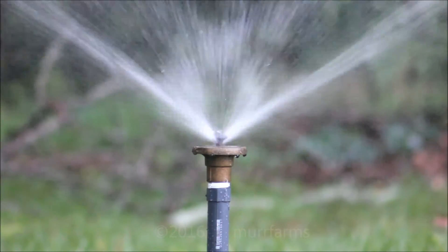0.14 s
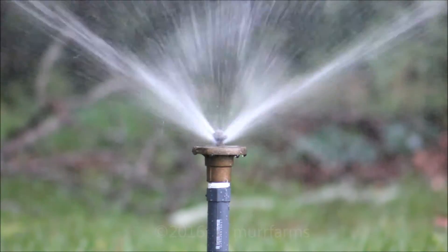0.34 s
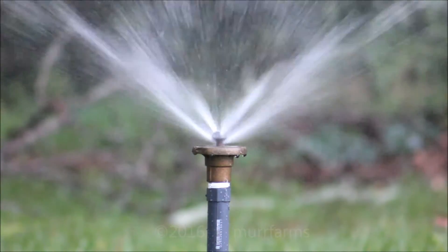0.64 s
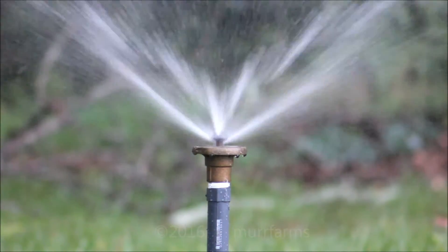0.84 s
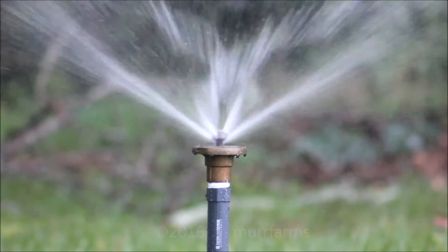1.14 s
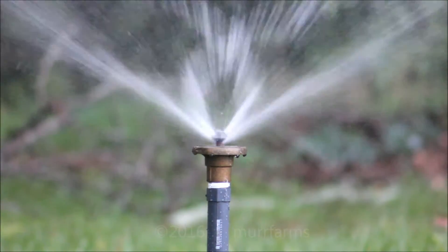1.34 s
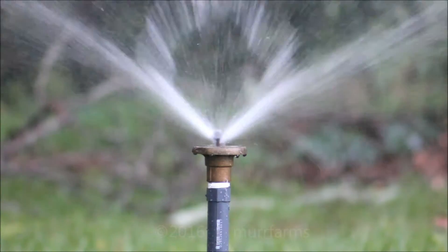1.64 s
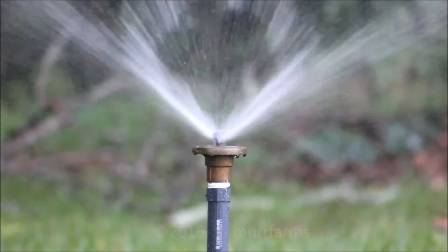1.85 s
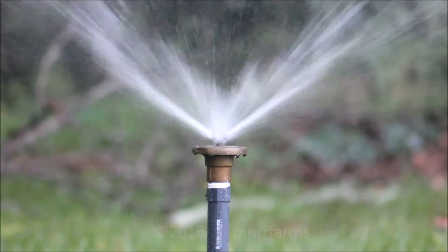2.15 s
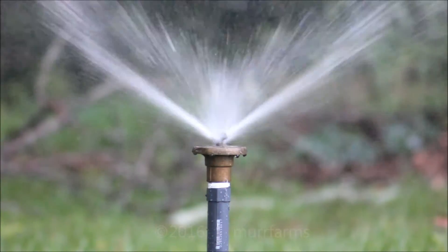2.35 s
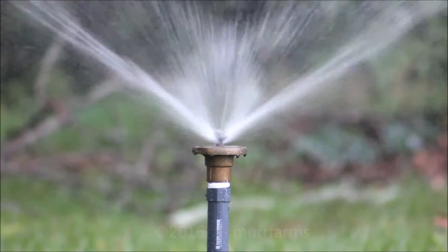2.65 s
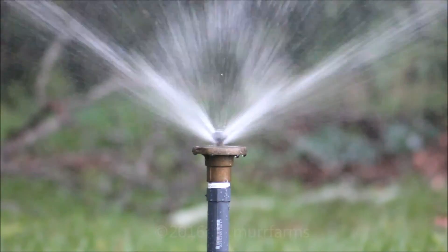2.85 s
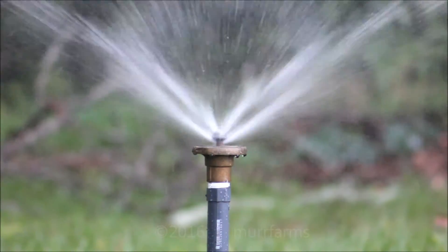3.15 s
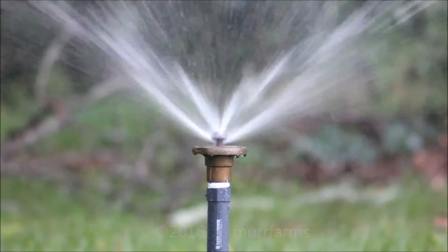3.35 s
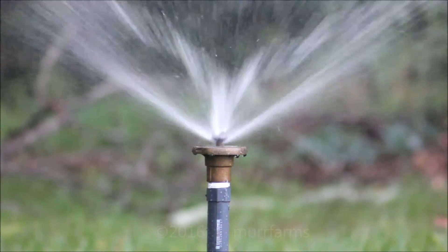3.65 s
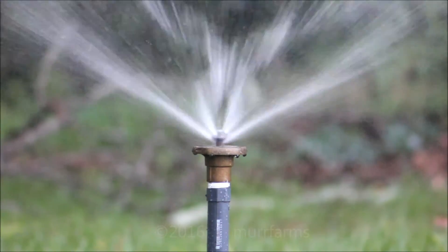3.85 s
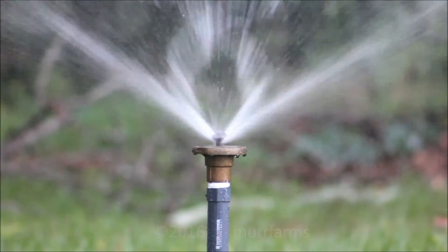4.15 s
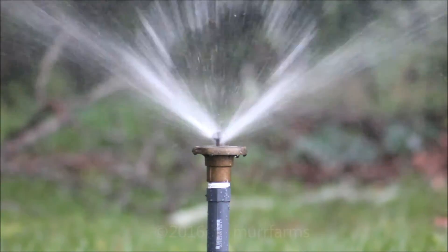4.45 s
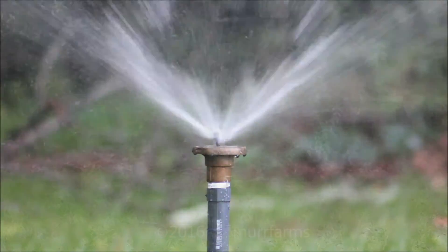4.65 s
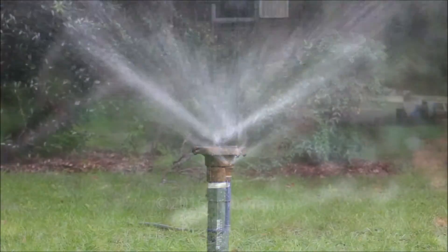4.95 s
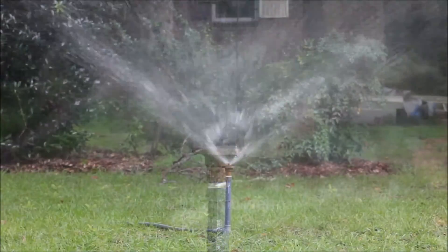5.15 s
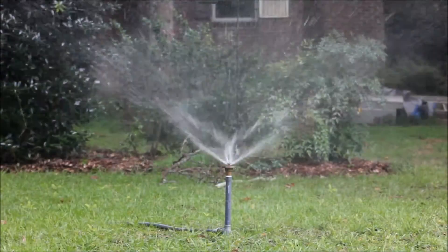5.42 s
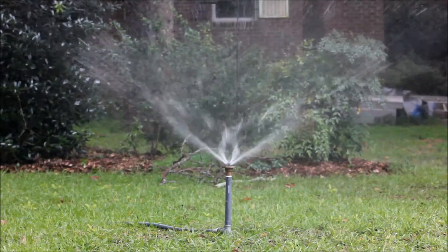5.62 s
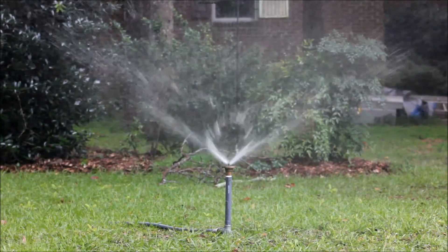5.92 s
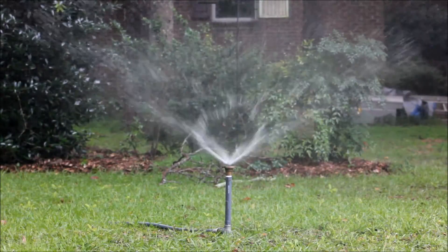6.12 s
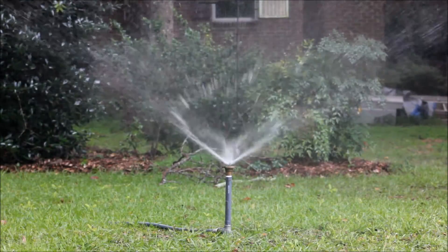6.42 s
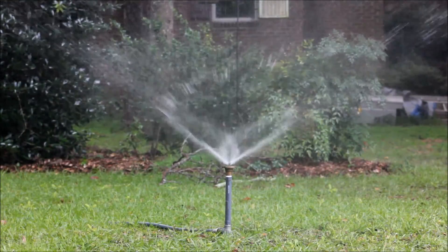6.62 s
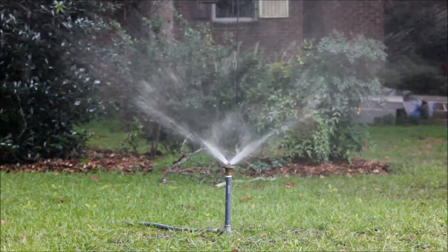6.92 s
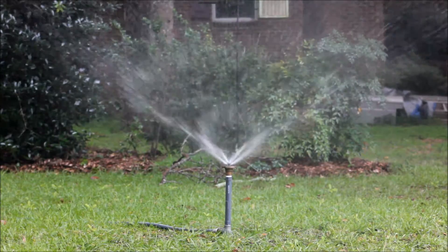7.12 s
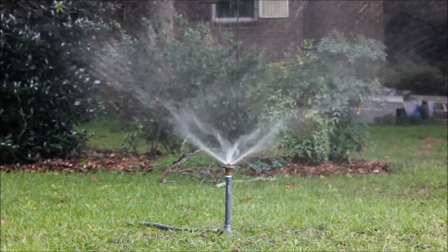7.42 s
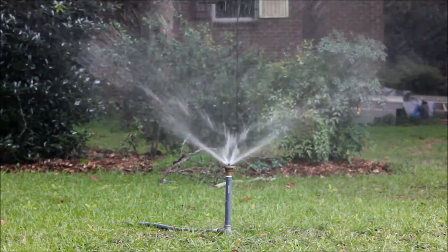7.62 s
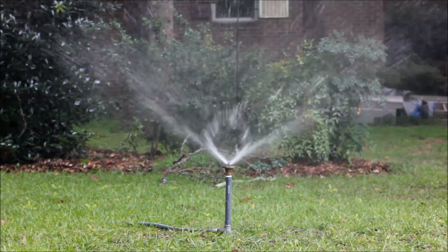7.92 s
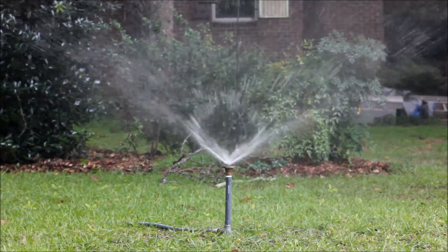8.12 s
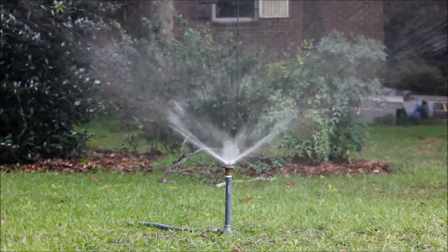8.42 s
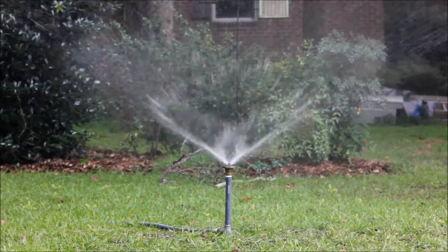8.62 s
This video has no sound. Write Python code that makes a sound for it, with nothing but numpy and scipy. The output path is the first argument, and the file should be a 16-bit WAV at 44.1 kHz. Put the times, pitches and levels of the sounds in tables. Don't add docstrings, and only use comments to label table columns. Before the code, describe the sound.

Outdoors in a yard, a spinning sprinkler gives a fine, rapidly fluttering hiss while cicadas drone brightly and throb about seven times a second, swelling over the first seconds. Sparse water drops snap on leaves. At about 5.5 seconds the sound cuts dead to a quieter view that fades up, with broader cicadas and sharp, high bird chips. Low traffic rumble lies far behind. One microphone, centred and practically mono.

```python
import sys
import numpy as np
from scipy import signal
from scipy.fft import rfft, irfft, next_fast_len
from scipy.io import wavfile
from scipy.ndimage import uniform_filter1d

SR = 44100
rng = np.random.default_rng(int(sys.argv[2]) if len(sys.argv) > 2 else 0)


def boost(x):
    u = np.asarray(x, float) / 20
    return 10 ** u


def waveform_to_disk(signal):
    frames = np.transpose(np.atleast_2d(signal))
    scaled = np.clip(frames, -1, 1) * 32767
    samples = np.round(scaled).astype(np.int16)
    wavfile.write(sys.argv[1], SR, samples)


N = 386757
CUT_S = 5.504


def since_cut():
    return np.arange(N) / SR - CUT_S


def rms_one(x):
    return x / np.sqrt(np.mean(x ** 2) + 1e-20)


def drift(rate_hz):
    pole = np.exp(-80 * np.pi * rate_hz / SR)
    noise = rng.standard_normal(N // 40 + 2002)
    slow = signal.lfilter([1], [1, -2 * pole, pole * pole], noise)[2000:]
    return np.interp(np.arange(N) / 40, np.arange(len(slow)), rms_one(slow))


def coloured(x, spectrum):
    size = next_fast_len(N)
    hz, db = np.transpose(spectrum)
    bin_hz = np.arange(size // 2 + 1) * SR / size
    shape_db = np.interp(np.log(bin_hz + 1), np.log(hz), db)
    return rms_one(irfft(rfft(x, size) * boost(shape_db), size)[:N])


def resonance(x, hz, width_hz):
    r = np.exp(-np.pi * width_hz / SR)
    poles = [1, -2 * r * np.cos(2 * np.pi * hz / SR), r * r]
    return signal.lfilter([(1 - r * r) / 2, 0, (r * r - 1) / 2], poles, x)


def grains(per_s, spread_db):
    size_db = spread_db * np.minimum(rng.exponential(1, N), 4)
    sizes = boost(size_db) * rng.choice([-1, 1], N)
    return rms_one(sizes * (rng.random(N) < per_s / SR))


def echoes(x, wet_db, decay_s):
    lags, sizes = rng.random((40, 2)).T
    path = np.zeros(4000)
    path[(60 + lags * 3900).astype(int)] = (2 * sizes - 1) * np.exp(-lags * 3900 / SR / decay_s)
    path *= boost(wet_db) / np.linalg.norm(path)
    path[0] = 1
    return signal.fftconvolve(x, path / np.linalg.norm(path))[:N]


def yard(rumble_db=-55, mains_db=-66, mains_hz=119.8):
    # hz, level_db (per Hz)
    rumble_spectrum = [(25, -30), (45, -11.5), (70, -7.5), (100, -2), (200, -2.5), (450, -6.5), (900, -6),
                       (1600, -11), (3000, -27)]
    # centre_hz, width_hz, first_view_db, second_view_db
    hums = [(120.7, 11, -74.5, -69), (99.7, 11.5, -74, -73), (712.6, 14, -69, -63.5), (726, 62, -72.5, -66),
            (916, 57, -67.5, -68)]
    out = boost(rumble_db) * coloured(rng.standard_normal(N), rumble_spectrum)
    second = since_cut() > 0
    for hz, width_hz, first_db, second_db in hums:
        tone = resonance(resonance(rng.standard_normal(N), hz, width_hz), hz, width_hz)
        power = uniform_filter1d(tone ** 2, size=SR // 8)
        tone = tone / (power + 1e-12) ** .4
        out += boost(np.where(second, second_db, first_db)) * rms_one(tone)
    mains = np.sin(2 * np.pi * mains_hz * np.arange(N) / SR)
    return out + boost(mains_db + drift(2.2)) * mains


def bird(overtone_db=-28, echo_db=-12, echo_s=0.024, droop_hz=250):
    # start_s, length_s, start_hz, top_hz, level_db
    chips = [
        (5.799, 0.026, 6000, 7660, -22),
        (5.888, 0.025, 5960, 7400, -20.5),
        (7.248, 0.044, 5920, 7630, -24.5),
        (7.327, 0.03, 6140, 7640, -22.5),
        (7.419, .035, 6090, 7600, -23),
        (8.374, 0.029, 5480, 7600, -19.5),
        (8.447, 0.02, 6800, 7600, -23),
        (8.532, 0.027, 7300, 7440, -21.5),
        (8.634, .03, 7060, 7440, -28),
        (8.747, 0.039, 5390, 7550, -21),
    ]
    out = np.zeros(2 * N)
    for start_s, length_s, start_hz, top_hz, level_db in chips:
        part = np.linspace(0, 1, round(length_s * SR))
        leap = (top_hz - start_hz) * np.clip(1 - part / 0.54, 0, 1) ** 2
        droop = droop_hz * np.clip(part / .4 - 1.5, 0, 1) ** 2
        phase = 2 * np.pi * np.cumsum(top_hz - leap - droop) / SR
        shape = np.minimum(part / 0.13, 1) * np.minimum((1 - part) / 0.89, 1)
        tone = np.sin(phase) + boost(overtone_db) * np.sin(2 * phase)
        out[round(start_s * SR):][:len(part)] += boost(level_db) * shape * tone
    wall = boost(echo_db) * np.roll(out, round(echo_s * SR))
    return echoes((out + wall)[:N], -6.5, 0.078)


def chorus(level_db=-39):
    # hz, level_db (per Hz)
    chorus_spectrum = [(2300, -19), (2900, -9.5), (3600, -7.5), (4400, -2.5), (5200, -3), (6050, 0),
                       (6900, -0.5), (7700, -5.5), (8700, -8), (9600, -13.5), (11000, -16)]
    far = coloured(rng.standard_normal(N) + .5 * grains(1500, 2.6), chorus_spectrum)
    return echoes(far, -9, .025) * boost(level_db + .5 * drift(8.5))


def cicada(modes, ribs_per_s, blur):
    out, snaps = 0, grains(ribs_per_s, 2.3)
    for k, (hz, width_hz, level_db) in enumerate(modes):
        drive = snaps + blur * rng.standard_normal(N)
        ring = resonance(resonance(drive, hz, width_hz), hz, width_hz * 2)
        out = out + (-1) ** k * boost(level_db + 0.78 * drift(17.0)) * ring
    return echoes(rms_one(out), -7.5, .025)


def belly_throbs_db(throb_s=.028):
    # first_throb_s, period_s, end_s, first_lift_db, last_lift_db
    throb_runs = [
        (2.13, 0.14, 2.56, 2.5, .3),
        (2.62, .1317, 3.6, .8, 4.5),
        (3.41, .138, 4.12, -0.5, 6),
        (4.239, .131, 5.9, 3.5, 5),
        (5.497, .131, 5.56, 3, 5.0),
        (6.4, 0.13, 7.7, 2, 1.5),
        (7.408, .123, 8.82, 2.5, 6.5),
    ]
    coarse_s = np.arange(0, N / SR + .002, .002)
    lift_db = np.zeros(len(coarse_s))
    for start, period, end, from_db, to_db in throb_runs:
        for s in np.arange(start, end, period):
            peak_db = np.interp(s, [start, end], [from_db, to_db])
            lift_db += peak_db * np.exp(-.5 * ((coarse_s - s) / throb_s) ** 2)
    return np.interp(np.arange(N) / SR, coarse_s, lift_db)


def near_cicadas():
    # centre_hz, width_hz, level_db
    throbber_modes = [(3660, 620, -12), (4250, 540, -6), (5380, 980, -7.5), (6073, 180, -0.5),
                      (5710, 260, -3.5), (6600, 800, -2), (7300, 690, -13.5), (8270, 820, -13),
                      (9300, 1400, -27.5)]
    late_modes = [(3720, 920, -24), (4110, 113, -1), (4076, 470, -2.5), (4580, 700, -4), (5410, 780, -0.5),
                  (6080, 530, 0.5), (6494, 370, 3.5), (7080, 510, -0.5), (7600, 290, -0.5),
                  (8030, 700, -12.5), (9000, 1100, -18.5)]
    t, after = np.arange(N) / SR, since_cut()
    behind_db = 3 * np.clip(1 - (after / 0.27) ** 2, 0, 1)
    swell_db = -31.5 - 26.5 * np.exp(-t / 2.05)
    tiring_db = -28 - 2.5 * after - behind_db
    throbber_db = np.where(after < 0, swell_db, tiring_db) + belly_throbs_db() - 3.5
    late_db = np.where(after < 0, -40.5 + 6 * after, -30.4 - behind_db)
    throbber = boost(throbber_db) * cicada(throbber_modes, 700, blur=1.5)
    return throbber + boost(late_db) * cicada(late_modes, 700, blur=2.0)


def patter(level_db=-66):
    return boost(level_db) * rms_one(resonance(grains(45, 3), 1940, 1800))


def drops(gain_db=-0.5, crack=2.9, ring_share=0.41, ring_cycles=7):
    # start_s, peak_db, ring_hz
    leaf_hits = [(0.824, -37, 2690), (1.3, -36, 1910), (1.439, -35, 1340), (1.591, -39, 1470),
                 (1.7349, -38, 2080), (1.8143, -40, 2000), (2.637, -32, 1500), (3.8462, -39, 1120),
                 (3.8547, -36, 2740), (3.8911, -39, 2680), (3.9634, -39, 1320), (4.137, -34, 2060),
                 (4.2497, -34, 2820), (4.5507, -36, 1950), (4.6673, -43, 2220), (4.736, -35, 2310),
                 (4.98, -34, 1770), (5.085, -39, 1390), (6.512, -37, 1700), (6.615, -35.5, 2380),
                 (6.7072, -37, 1950), (7.914, -36, 2260), (8.209, -36.5, 1770), (8.694, -37, 2270)]
    out, age_s = np.zeros(N + 900), np.arange(900) / SR
    band = signal.butter(2, [1400, 5500], "band", fs=SR, output="sos")
    for start_s, peak_db, hz in leaf_hits:
        ring = np.sin(2 * np.pi * hz * age_s) * np.exp(-age_s * hz / ring_cycles)
        splash = .35 * rng.standard_normal(900) * np.exp(-age_s / .003)
        snap = -3.5 * (age_s == 0)
        hit = ring_share * ring + crack * signal.sosfilt(band, splash + snap)
        out[round(start_s * SR):][:900] += boost(peak_db + gain_db) * hit
    return out[:N]


def sprinkler(spray_db=-49, whistle_db=-58, second_view_db=0.0, grain=0.27, flutter_depth=.3, wobble=.45):
    # hz, level_db (per Hz)
    spray_spectrum = [(300, -30), (700, -3), (1500, 0.5), (2500, 2), (5000, -6.5), (8000, -12),
                      (10000, -2), (11300, -4.5), (12200, -6.6), (13200, -4.8), (14500, -2.2), (15700, -1.2)]
    jets_per_s = np.where(since_cut() < 0, 100.15, 100.9)
    jet_phase = 2 * np.pi * np.cumsum(jets_per_s) / SR
    lean = jet_phase / 20
    chop = np.cos(jet_phase) + wobble * np.cos(jet_phase + lean) + 0.22 * np.cos(jet_phase + 2 * lean)
    water = coloured(rng.standard_normal(N) + grain * grains(3000, 7.8), spray_spectrum)
    dull = signal.sosfilt(signal.butter(2, 2500, fs=SR, output="sos"), water)
    view_db = np.where(since_cut() > 0, second_view_db, 0)
    hiss = dull + (water - dull) * boost(view_db) * np.maximum(1 + flutter_depth * chop, 0)
    cavity = resonance(resonance(rng.standard_normal(N), 10650, 480), 10650, 480)
    cavity = rms_one(cavity) * np.maximum(1 + 0.91 * chop, 0)
    surge_db = .35 * drift(5.0)
    return boost(spray_db + surge_db) * hiss + boost(whistle_db) * cavity


def scene():
    background = yard() + bird() + chorus() + near_cicadas()
    return np.tile(background + patter() + drops() + sprinkler(), (2, 1))


def edit_db(first_view_db=1.15, second_view_db=.8, fade_from_db=-8, fade_in_s=1.57):
    part = np.clip(since_cut() / fade_in_s, 0, 1)
    fade_db = 20 * np.log10(part + (1 - part) * boost(fade_from_db))
    return np.where(since_cut() < 0, first_view_db, second_view_db + fade_db)


def slips(mid, gain_db=-0.5, width_hz=1400):
    # centre_s, centre_hz
    slip_bands = [(1.39, 6400), (1.482, 8950), (1.482, 11000), (1.97, 6200), (1.994, 5400), (3.41, 5200),
                  (3.41, 15000), (3.665, 11000), (4.085, 7600), (4.316, 8300), (6.406, 7600),
                  (6.406, 14500), (7.102, 6900), (7.102, 12000)]
    side, hz = np.zeros(N), np.arange(1025) * SR / 2048
    for centre_s, centre_hz in slip_bands:
        at = round(centre_s * SR) - 1024
        band = abs(hz - centre_hz) < width_hz / 2
        sizes = abs(rfft(mid[at:at + 2048])) * band
        noise = irfft(sizes * np.exp(2j * np.pi * rng.random(1025)))
        side[at:at + 2048] += boost(gain_db) * noise * np.hanning(2048) ** 1.2
    return side * [[1], [-1]]


def top_cut(x):
    return signal.sosfilt(signal.butter(12, 16990, fs=SR, output="sos"), x)


def record(dry):
    size, top_hz = next_fast_len(N), 15750
    below = np.arange(size // 2 + 1) * SR / size < top_hz
    cut = irfft(rfft(dry * boost(edit_db()), size) * below, size)[:, :N]
    return top_cut(cut + slips(cut[0]) + 0.00091)


dry = scene()
out = record(dry)
waveform_to_disk(out)
```